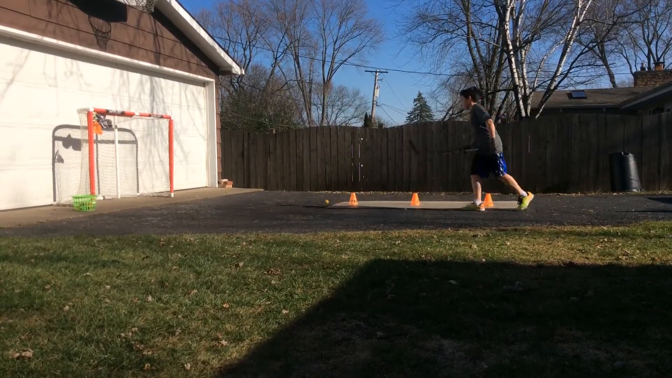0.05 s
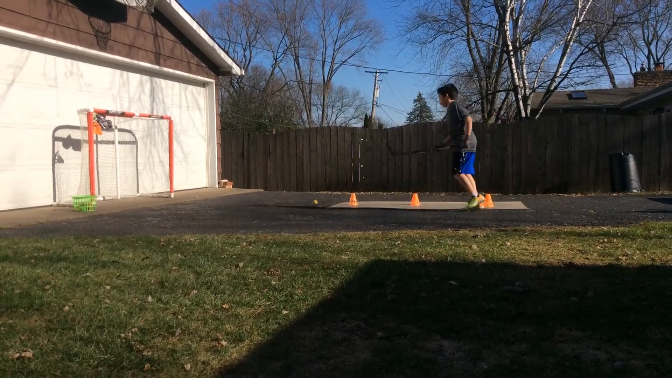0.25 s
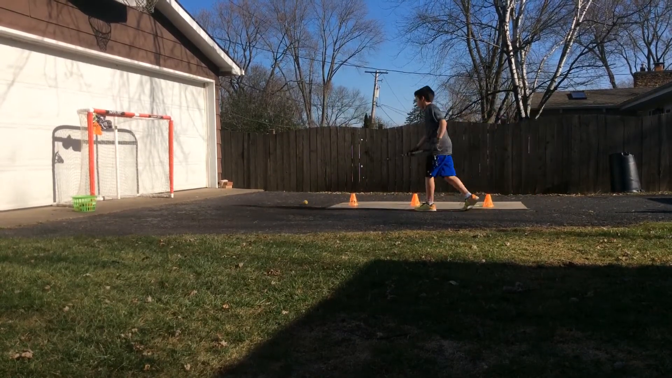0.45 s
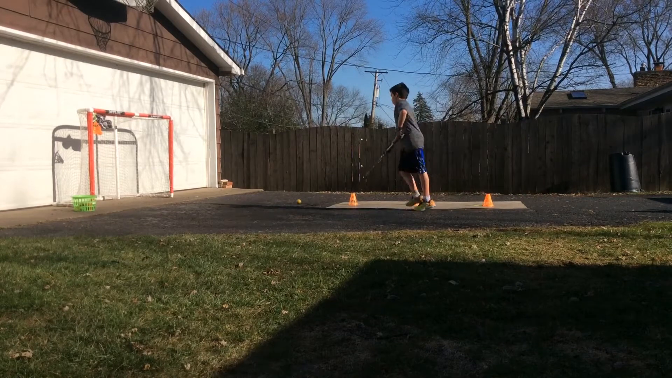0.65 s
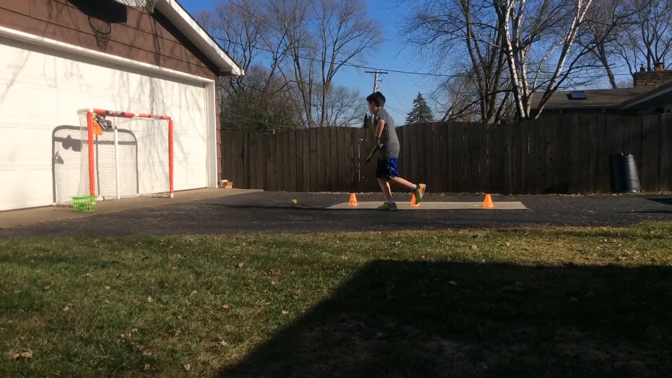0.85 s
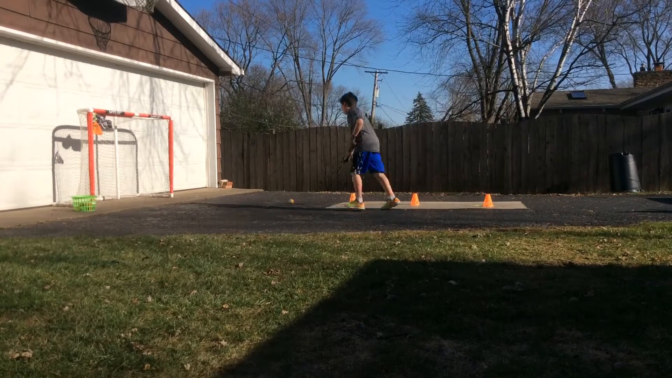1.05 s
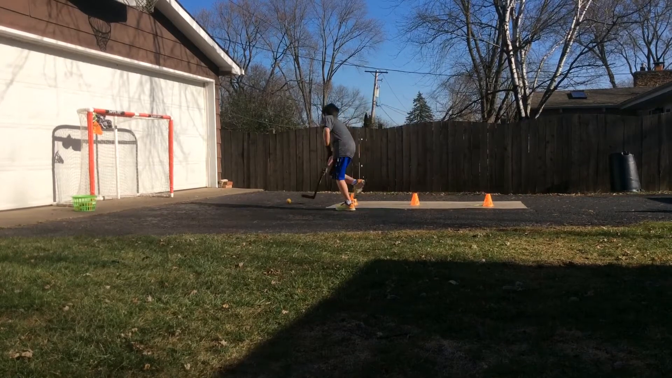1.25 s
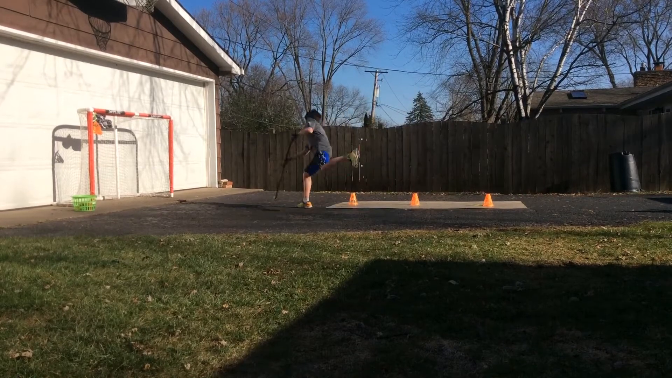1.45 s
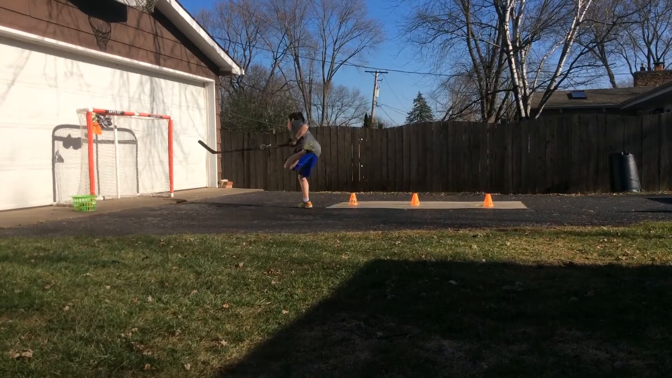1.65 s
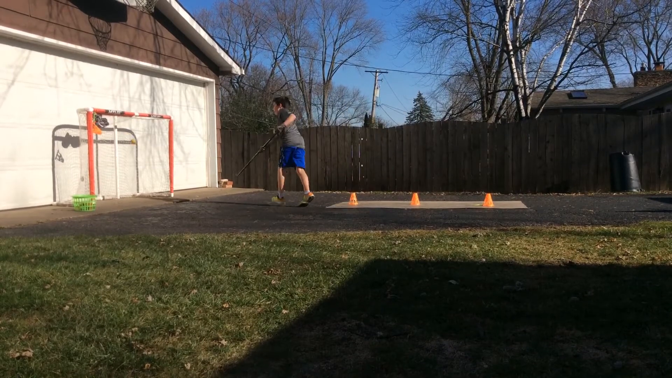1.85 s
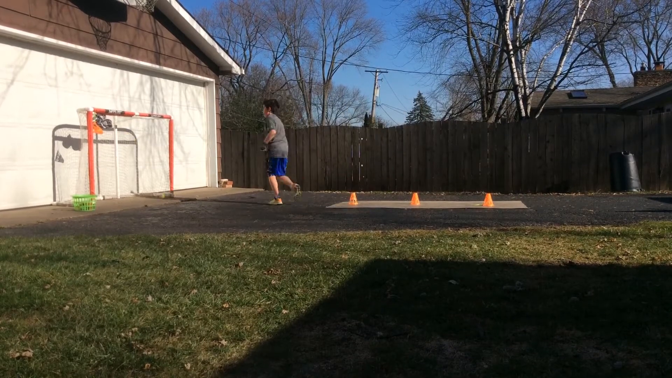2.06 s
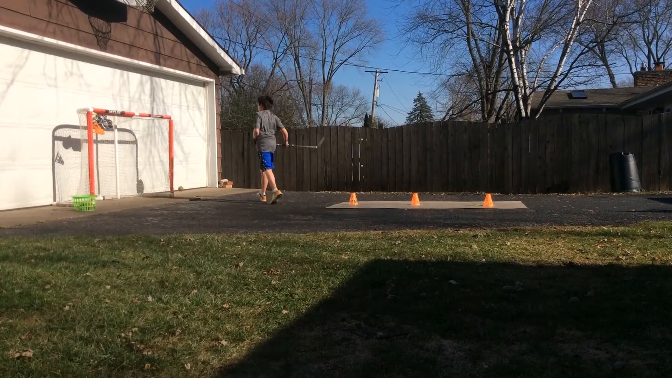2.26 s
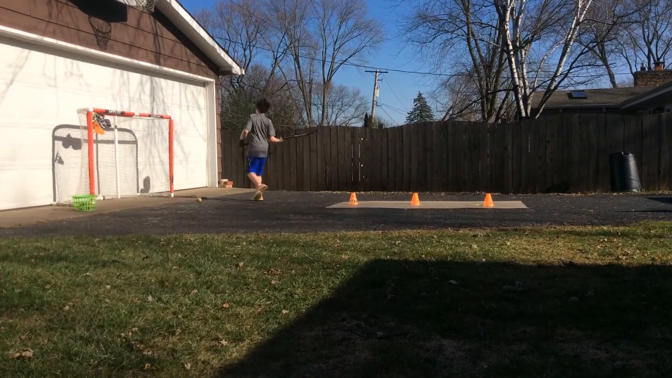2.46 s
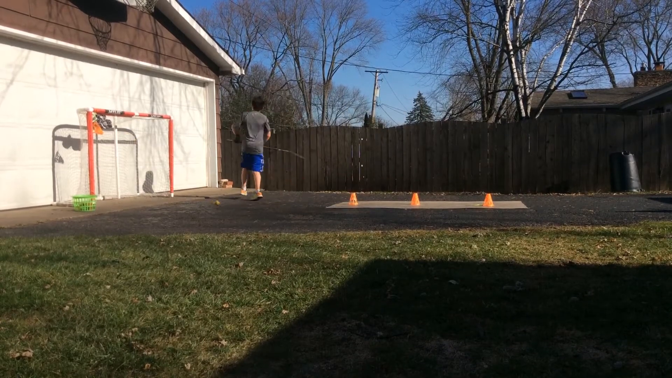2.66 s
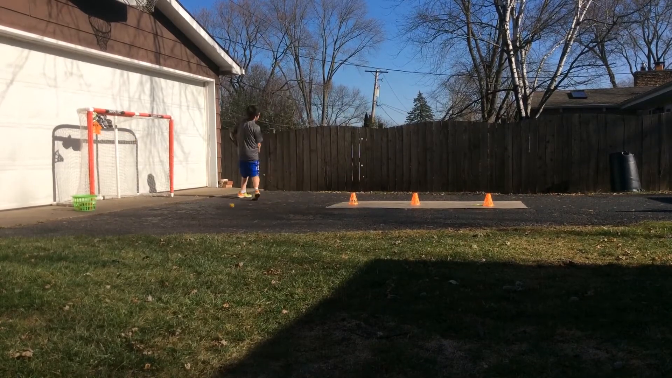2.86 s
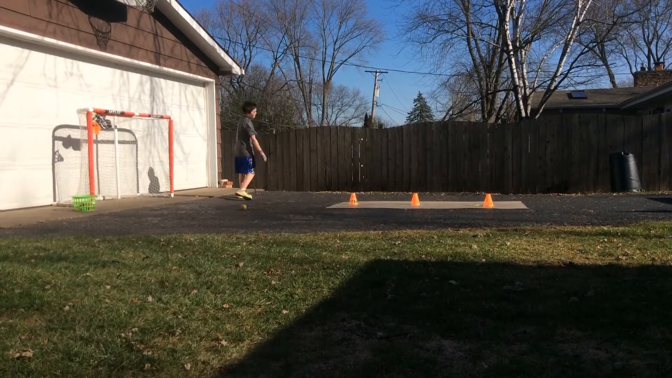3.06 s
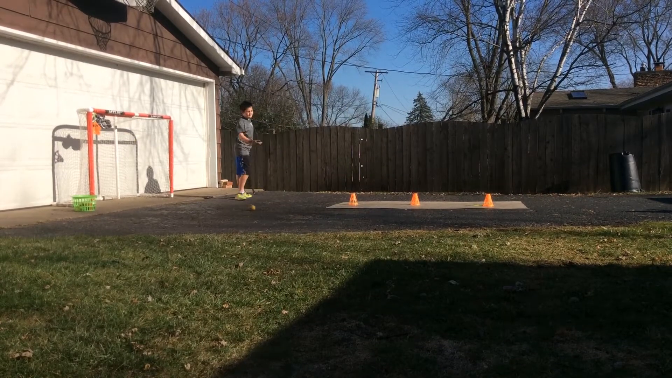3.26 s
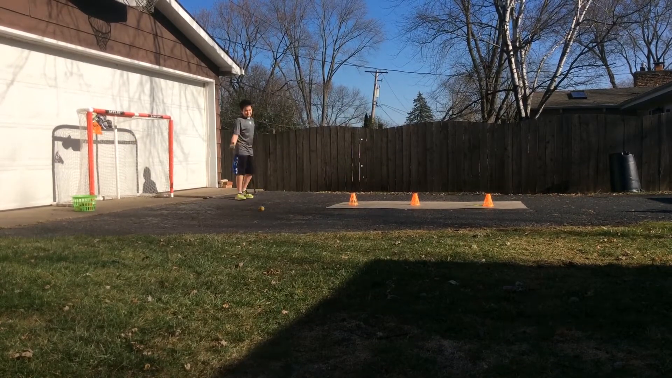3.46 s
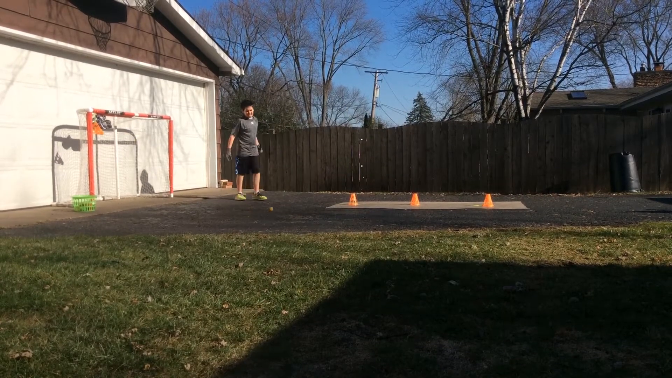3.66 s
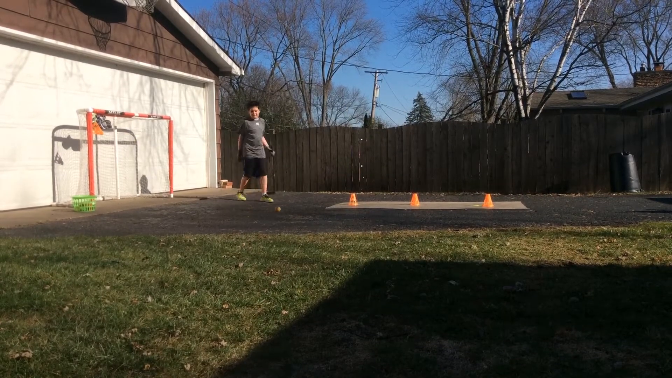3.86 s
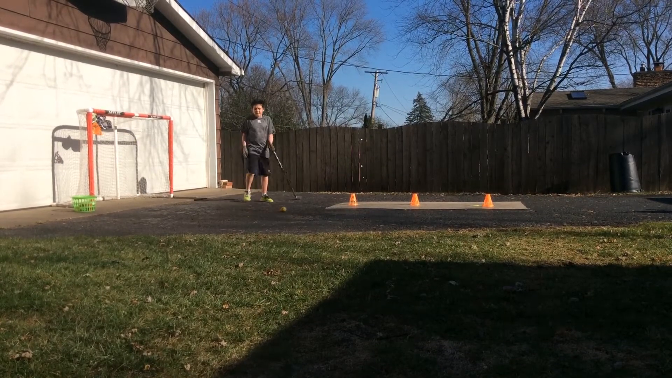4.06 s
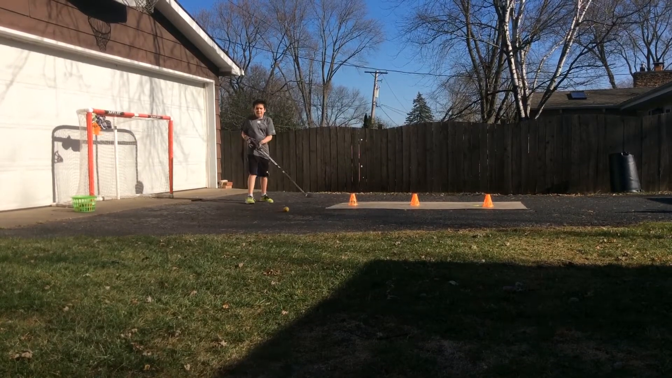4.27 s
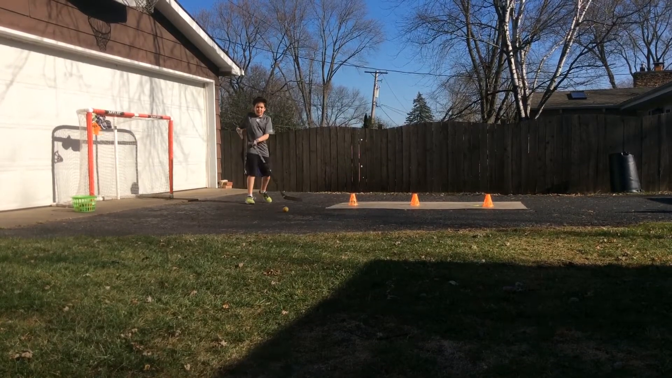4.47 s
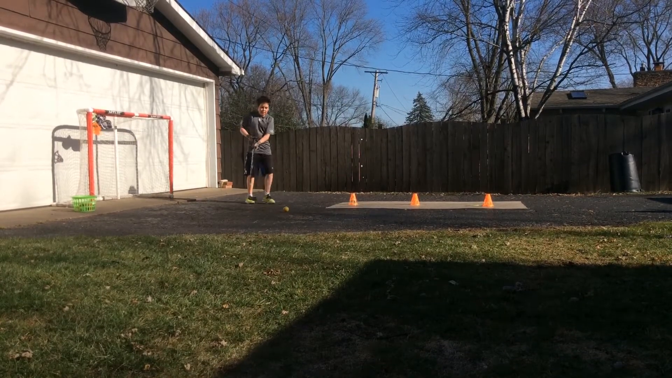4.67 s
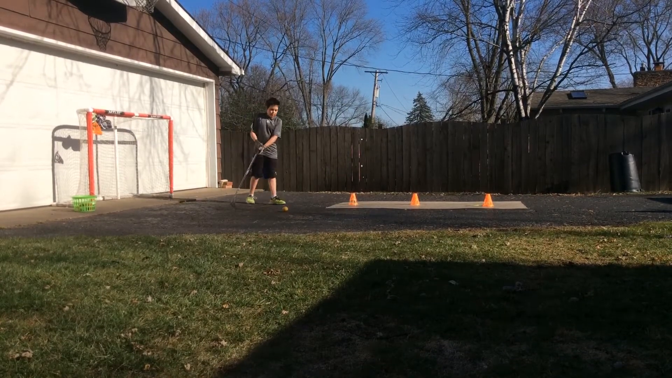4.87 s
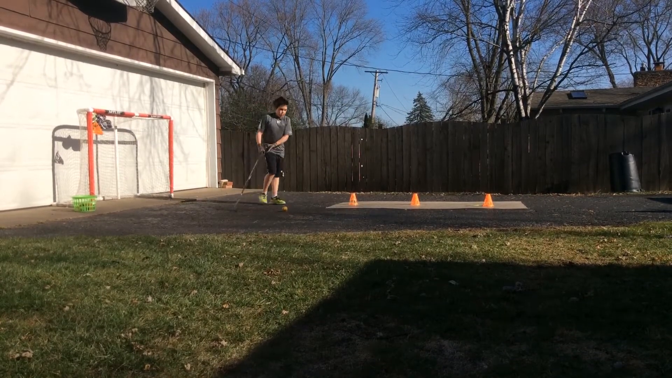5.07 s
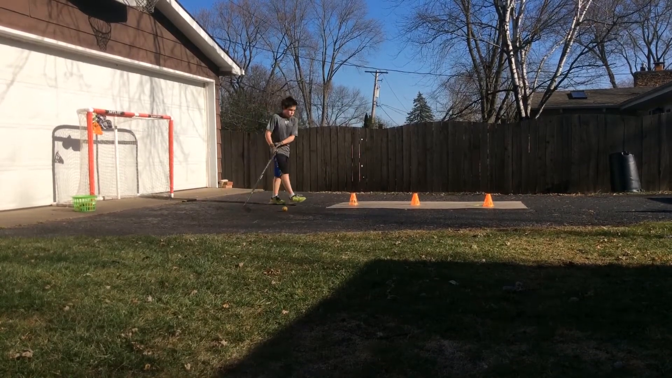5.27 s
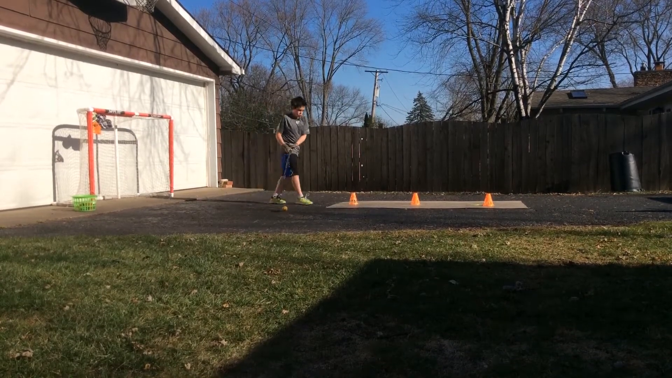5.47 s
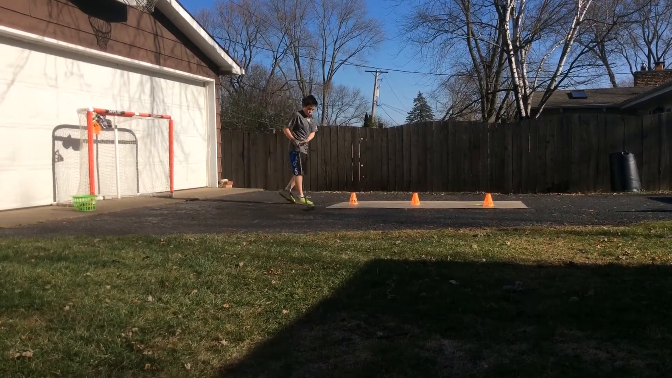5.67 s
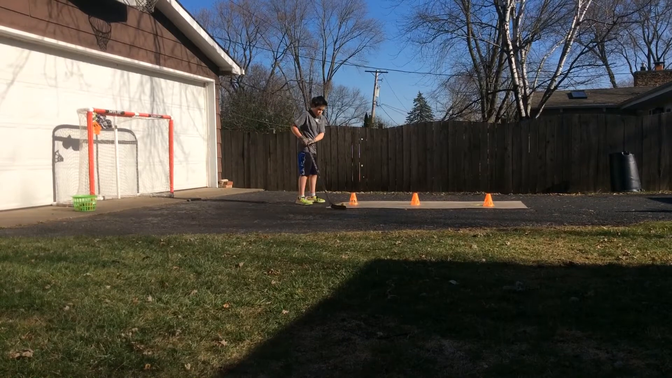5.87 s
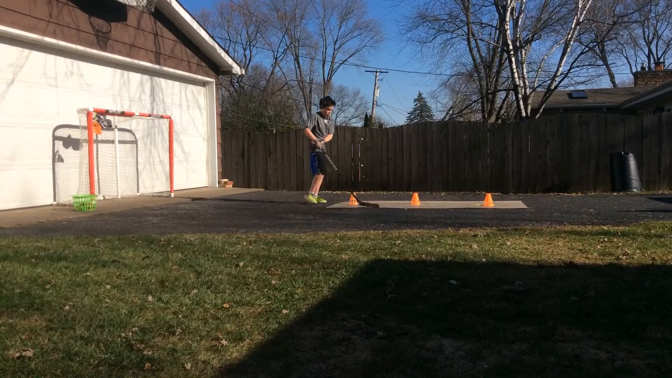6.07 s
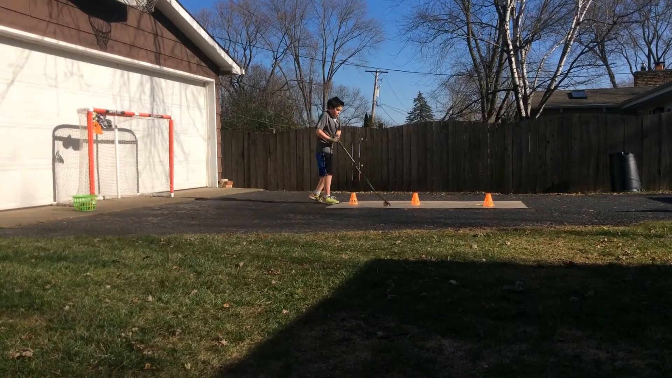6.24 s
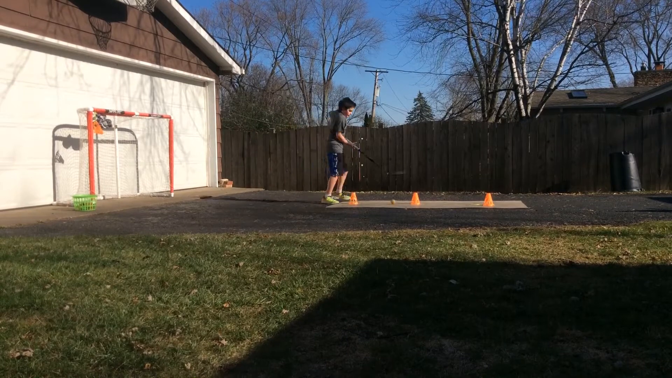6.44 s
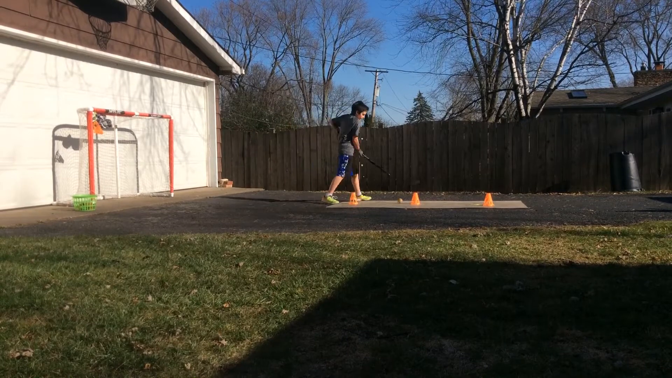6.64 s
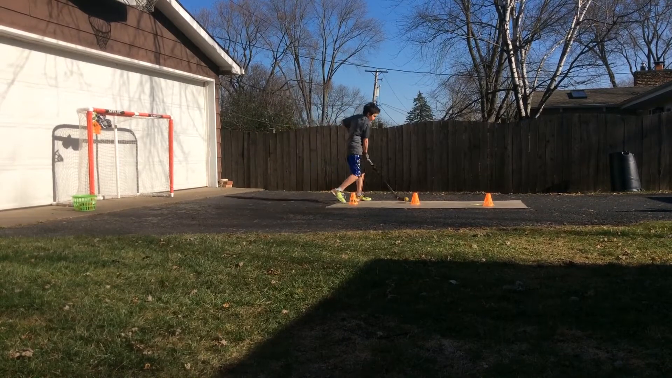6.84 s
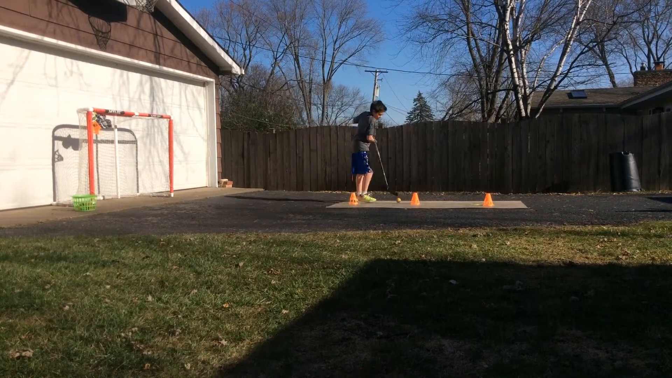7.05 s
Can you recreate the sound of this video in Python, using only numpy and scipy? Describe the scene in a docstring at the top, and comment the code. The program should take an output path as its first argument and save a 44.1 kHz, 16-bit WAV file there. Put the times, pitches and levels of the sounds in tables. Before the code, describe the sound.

Hockey stick blade clacks and taps on a driveway, one shot bangs a garage door, a stick slaps the ground, birds chirp over light wind.

```python
"""Stick handling on a driveway, heard from the lawn, with light wind on the microphone and a distant town hush.
A hockey blade taps a puck over asphalt and a plastic pad, amid dull footfalls; small birds chirp in the trees.
One shot bangs into the garage door, then the stick is slapped on the ground; short blade drags come before
and after. Blows are noise bursts that ring decaying modes, chirps are gliding whistles, air and drags are
shaped noise. Garage and fence throw the clacks back; a faint dull tail returns from the houses around."""
import sys
import numpy as np
from scipy import signal
from scipy.fft import rfft, irfft
from scipy.io import wavfile
from scipy.ndimage import uniform_filter1d

SR = 44100
rng = np.random.default_rng(int(sys.argv[2]) if len(sys.argv) > 2 else 0)


def to_wav(s):
    """Save 16-bit WAV."""
    ch = np.atleast_2d(s).T  # columns
    pcm = np.round(np.clip(ch, -1, 1) * 32767)  # PCM
    wavfile.write(sys.argv[1], SR, pcm.astype(np.int16))


N = 313492
TIME = np.arange(N) / SR
SHORT = TIME[:SR // 2]  # half a second, for blows and echo tails

# Spectrum of wind on the microphone. Each row: frequency in Hz, relative density in dB per Hz.
WIND_SPECTRUM = [(20, -38.5), (32, -22.5), (45, -11), (62, 3), (85, -2), (110, -3.5), (150, -9.5),
                 (200, -14), (280, -39), (600, -55)]
# Spectrum of the still air of the neighbourhood. Each row: frequency in Hz, relative density in dB per Hz.
TOWN_SPECTRUM = [(110, -29.5), (200, -2), (360, -6.5), (660, -9.5), (790, -5), (1000, -9), (1350, -8),
                 (2500, -20.5), (3800, -22.5), (5000, -27.5), (6800, -32), (8800, -27.5), (13500, -43),
                 (16000, -82.5)]
# Swell of the wind. Each row: time in seconds, relative level in dB.
WIND_GUSTS = [(0.0, -54.5), (0.59, -57), (0.75, -55.5), (2.12, -55), (2.67, -56), (3.28, -52.5), (4.2, -56),
              (5.13, -55), (6.1, -55), (7.11, -53)]
# Swell of the town's hush. Each row: time in seconds, level in dB before its drift.
TOWN_HUSH = [(0, -63), (1.0, -63), (2.4, -61.5), (3.3, -60.5), (4.4, -63), (5.8, -58.5), (6.6, -62.5),
             (7.11, -60.5)]
# Blade clacks, with a few of their duller late echoes as rows of their own. Each row: start in seconds,
# relative strength in dB, body in dB (low end that the ground adds), edge in dB (treble from the hardness
# of the contact), relative chatter in dB, garage echo in dB.
BLADE_CLACKS = [(0.103, -25.5, 10, 5, -10, -4), (0.906, -22.5, 15.5, -4.5, -4, -9),
                (0.926, -14, 8.5, -16, -5, -17), (1.187, -6.5, -15, -10, -23, -8.5),
                (1.479, -0.5, -5, -1.5, -8, -9), (1.51, -4.5, -12, -22, -6, -18),
                (1.524, -16, -4, 11.5, -6, -21), (1.6, 5, -2, 1.5, -8, -3), (1.624, -7, -4, 11, 0, -9),
                (2.078, -21, 13.5, -15, 5, -17), (2.239, -12.5, 7, 7.5, -13.5, -11),
                (2.468, -10.5, 10.5, -11, 0, -25), (2.492, -19, 4, -12, -9, -22), (2.653, -34, 8, 9, 0, 1),
                (2.917, -18.5, -7, -5.5, 1, -29), (3.818, -30, -6, 8, -6, -12),
                (3.868, -6, -6.5, -36, -6.5, -16), (4.2, -0.5, -11.5, -2.5, 4.5, 6),
                (5.043, 2.5, -9.5, -9, 3.5, 3), (5.205, -21, -4, 0, -4, -2), (5.305, -29, 9, 7, -10, -14),
                (5.399, -8.5, -7, -5.5, 3, -23), (5.432, -12, 1, -9, -6, -12), (5.489, -5, -5, 0.5, 2, -1),
                (5.586, -12, 11, -3, 5, -5), (5.637, -17, 8.5, 15, -12, -4), (5.739, -21.5, 2, 3.5, 2, 1.5),
                (5.9, -4, 1.5, -17.5, 3, -13), (6.011, -10, -3, -15, -2, -20),
                (6.108, -22.5, 5.5, -5.5, 3, 3.5), (6.217, -.5, -3.5, -9, 1, -11),
                (6.334, -17.5, 4.5, -1, 1, -6.5), (6.902, -8.5, 11.5, -9, -2, -6),
                (6.928, -10.5, 7, -12, 6, -20), (6.974, -9, -5, 7.5, -8.5, -22)]
# Ringing of the blade. Each row: frequency in Hz, relative level in dB, 60 dB decay in seconds.
BLADE_MODES = [(584, 9, 0.072), (797, 11, 0.094), (1810, 3, 0.032), (1810, -17, 0.071),
               (2206, 11.5, 0.0252), (2300, 4.5, 0.06), (3310, 3.5, 0.038), (3794, 12, 0.045)]
# Colour of a middling clack. Each row: frequency in Hz, gain in dB.
CLACK_COLOUR = [(70, -6.5), (220, -4.5), (480, 0), (800, -2), (1250, -4), (1650, 1.5), (2300, -2),
                (3800, -2), (5200, -3), (9500, -6.5), (15500, -24)]
# Footfalls and dull bumps. Each row: start in seconds, relative strength in dB, 60 dB decay in seconds.
FOOTFALLS = [(0.129, -6, 0.14), (0.923, -7.5, 0.049), (1.234, -6.5, 0.3), (1.578, -3, 0.078),
             (1.589, 7.5, 0.064), (1.611, -0.5, 0.14), (2.034, -3, 0.033), (2.058, -3, 0.092),
             (2.237, 0.5, 0.057), (2.468, 6, 0.13), (6.228, -11, 0.061), (6.9, -18, 0.11)]
# Bird chirps. Each row: start in seconds, length in seconds, top pitch in Hz, end pitch in Hz,
# level in dB before the paths to the microphone.
BIRD_CHIRPS = [(0.664, 0.048, 3200, 2890, -72), (0.758, .06, 3500, 3050, -65),
               (1.353, .04, 4140, 3700, -64), (1.386, 0.095, 3350, 3130, -58),
               (1.961, 0.056, 3280, 3200, -70), (2.283, 0.037, 3120, 2970, -66),
               (2.38, 0.052, 5380, 5150, -68.5), (2.675, 0.098, 3770, 2896, -54),
               (2.803, 0.072, 3970, 3400, -61.5), (3.301, 0.067, 3950, 2890, -62.5),
               (3.38, 0.08, 4100, 2590, -71.5), (3.506, 0.096, 5300, 3130, -63),
               (4.527, 0.051, 4090, 3570, -59), (4.596, .035, 3500, 3130, -61.5),
               (4.783, 0.12, 3900, 2585, -57), (5.213, 0.027, 5630, 5200, -65.5),
               (5.275, 0.085, 3760, 3500, -65.5), (6.287, 0.094, 3530, 2880, -62.5),
               (6.629, 0.048, 3194, 2930, -66.5), (6.838, 0.058, 5100, 5260, -70.5)]
# Blade drags over grit and pad. Each row: start in seconds, length in seconds, grit level in dB,
# grit treble in dB.
BLADE_DRAGS = [(1.202, 0.079, -67, 4), (1.481, 0.13, -56.5, 1), (1.63, 0.06, -60, 26),
               (3.225, 0.11, -55.5, 9), (3.805, 0.11, -64, 16), (5.402, 0.23, -56, -7.5),
               (5.737, 0.064, -59, -6), (5.923, 0.25, -61, -6), (6.217, 0.24, -61.5, -2),
               (6.894, 0.2, -62.5, -6.5)]
# The shot on the garage door. One row: relative strength in dB, body in dB, edge in dB, relative chatter
# in dB, garage echo in dB.
DOOR_SHOT = (0, 4, -0.5, -4, -6.5)
# Ringing of the door panel. Each row: frequency in Hz, relative level in dB, 60 dB decay in seconds.
DOOR_MODES = [(151, -7, .18), (200, -1.5, 0.082), (287, -1, 0.08), (360, 0, 0.071), (437, -1, 0.13),
              (632, -3, 0.1), (1240, -8, 0.06), (1307, -3, 0.048), (1510, 7.5, 0.019), (1550, 3, .07),
              (1580, 0, 0.067), (4800, -1, 0.015)]
# Colour of the door blow. Each row: frequency in Hz, gain in dB.
DOOR_COLOUR = [(70, 0), (220, -2.5), (480, -1.5), (800, -5.5), (1250, -1.5), (1650, -3.5), (2300, -5),
               (3800, -1.5), (5200, -11), (9500, -0.5), (15500, -17)]
# The stick slapped flat on the ground: heel, toe, one bounce. Each row: start in seconds, relative strength
# in dB, body in dB, edge in dB, relative chatter in dB, garage echo in dB.
STICK_SLAPS = [(2.9793, 7.6, -2.5, 6, -10, 1), (2.985, 13.3, -4.5, -21, -2, -3.5),
               (3.169, 1.5, 2, -4.5, 8, 0)]
# Ringing of the whole shaft. Each row: frequency in Hz, relative level in dB, 60 dB decay in seconds.
SHAFT_MODES = [(376, 0, 0.096), (474, -11, 0.054), (800, -1.5, 0.11), (1216, 6, 0.12), (1275, 3.5, 0.075),
               (1376, -5, 0.085), (1640, -8, 0.07), (1500, -15, 0.097), (1815, 1.5, 0.12), (2274, 1, 0.05),
               (3160, -4, 0.045), (3820, -5, 0.028)]
# Colour of a middling slap. Each row: frequency in Hz, gain in dB.
SLAP_COLOUR = [(70, -19), (220, -7.5), (480, -2), (800, 0), (1250, -1), (1650, 1), (2300, -1.5),
               (3800, 1.5), (5200, -5.5), (9500, -16.5), (15500, -31.5)]

# body acts in full below its first frequency and not above its second; edge the other way round
BODY_HZ, EDGE_HZ = (740, 1650), (2300, 3800)
FENCE_S = 0.032  # lag of the fence echo behind the direct sound
# every chirp flicks up to its top pitch, then slides to its end pitch and levels off
CHIRP_RISE_S, CHIRP_RISE_OCT, CHIRP_EASE = 0.018, 0.2, 1.6
# the blade skips more on smooth ground than on sharp grit: clatter against grit level,
# and its loss per dB of grit treble
CLATTER_DB, CLATTER_DB_PER_TREBLE = -1.5, 0.2
SHOT_S = 1.7897  # moment at which the shot lands on the garage door
# the door panel then knocks in its track: spacing, first knock and loss per knock, added body and edge
RATTLE_S = 0.0143
RATTLE_DB, RATTLE_LOSS_DB, RATTLE_BODY_DB, RATTLE_EDGE_DB = -15.5, 4, 6, -6
TOP_HZ = 15900  # upper limit of the recorder


def amp(db):
    """Decibels to gain."""
    return 10 ** (np.asarray(db) / 20)


def unit(x):
    """Scale to an energy of one."""
    return x / np.sqrt(np.sum(x ** 2))


def level(x, db):
    """Scale to an rms level."""
    return unit(x) * np.sqrt(len(x)) * amp(db)


def fade(t60):
    """Exponential decay, 60 dB down after t60 seconds."""
    return np.exp(-np.log(1000) * SHORT / max(t60, 1 / SR))


def add(out, s, x):
    """Mix x into out from time s."""
    i = int(s * SR)
    out[i:i + len(x)] += x[:len(out) - i]


def late(x, s):
    """Delay by s seconds."""
    return np.concatenate([np.zeros(int(s * SR)), x])[:len(x)]


def through(x, response):
    """Pass a sound through an impulse response."""
    return signal.fftconvolve(x, response)[:len(x)]


def colour(x, points):
    """Causal minimum-phase filter whose gain follows (Hz, dB) points."""
    size = 4096
    hz, db = np.transpose(points)
    grid = np.maximum(np.arange(size // 2 + 1) * SR / size, 1)
    gain_db = np.interp(np.log(grid), np.log(hz), db)
    # folding the cepstrum forward in time makes the filter causal
    cepstrum = irfft(np.log(amp(gain_db)))
    cepstrum[1:size // 2] *= 2
    cepstrum[size // 2 + 1:] = 0
    return through(x, irfft(np.exp(rfft(cepstrum))))


def walk(rate):
    """Slow random drift with an rms of one, from random values drawn rate times a second and smoothed."""
    k = int(SR / rate)
    held = np.repeat(rng.standard_normal(N // k + 1), k)
    smooth = uniform_filter1d(uniform_filter1d(held, k), k)
    return level(smooth[:N], 0)


def air(wind_db=2.0, gust_db=1.5, drift_db=1.82):
    """Wind buffets the microphone over the even hush of the distant town: two coloured, drifting noises."""
    wind = level(colour(rng.standard_normal(N), WIND_SPECTRUM), wind_db)
    town = level(colour(rng.standard_normal(N), TOWN_SPECTRUM), 0)
    gusts_db = np.interp(TIME, *np.transpose(WIND_GUSTS)) + gust_db * walk(9)
    hush_db = np.interp(TIME, *np.transpose(TOWN_HUSH)) + drift_db * walk(12)
    return wind * amp(gusts_db) + town * amp(hush_db)


def burst(envelope):
    """A spray of tiny impacts under an envelope, with its energy spread evenly over frequency."""
    x = rng.standard_normal(len(envelope)) * envelope
    gate = np.minimum(1, 4 * envelope / envelope.max())
    for _ in range(6):
        # a hard contact excites all frequencies alike, yet stays within its short span
        flat = irfft(np.exp(1j * np.angle(rfft(x))), len(x))
        x = gate * flat
    return unit(x)


def contact(db, body_db, edge_db, chatter_db, tone, contact_s, chatter_t60):
    """A hard crack and a chatter as the parts settle, coloured by the ground and the contact's hardness."""
    # the contact force peaks after two contact times, then lets go
    crack = burst((SHORT / contact_s) ** 2 * np.exp(-SHORT / contact_s))
    chatter = amp(chatter_db) * late(burst(fade(chatter_t60)), 0.002)
    hz, tone_db = np.transpose(tone)
    body = np.interp(hz, BODY_HZ, [body_db, 0])
    edge = np.interp(hz, EDGE_HZ, [0, edge_db])
    return amp(db) * colour(unit(crack + chatter), np.transpose([hz, tone_db + body + edge]))


def ringing(modes, db, scatter_db=4.0):
    """Response of a struck body: the blow plus decaying modes, whose shares depend on where it lands."""
    out = signal.unit_impulse(len(SHORT))
    for hz, mode_db, t60 in modes:
        share = amp(db + mode_db + scatter_db * rng.uniform(-1, 1))
        per_sample = 2 * np.log(1000) / (t60 * SR)  # evens out the peaks of long and short modes
        out = out + share * per_sample * fade(t60) * np.cos(2 * np.pi * hz * SHORT)
    return out


def blows(table, modes, tone, ring_db, contact_s, chatter_t60, wall_s, wall_edge_db, fence_db, fence_edge_db,
          wall_chatter_db=-3, fence_chatter_db=5):
    """Each row rings the body and arrives direct, off the flat garage wall, and scattered by the fence."""
    out = np.zeros(N)
    for s, db, body_db, edge_db, chatter_db, echo_db in table:
        # each path: lag in seconds, then changes of strength, edge and chatter in dB
        paths = [(0, 0, 0, 0),
                 (wall_s, echo_db, wall_edge_db, wall_chatter_db),
                 (FENCE_S, fence_db, fence_edge_db, fence_chatter_db)]
        for lag, path_db, dull_db, smear_db in paths:
            hit = contact(db + path_db, body_db, edge_db + dull_db, chatter_db + smear_db,
                          tone, contact_s, chatter_t60)
            add(out, s + lag, through(hit, ringing(modes, ring_db)))
    return out


def clacks():
    """Light taps, and their late echoes, carry the ring of the blade only."""
    return amp(-3.5) * blows(
        BLADE_CLACKS, BLADE_MODES, CLACK_COLOUR, ring_db=-9.5, contact_s=0.00045, chatter_t60=0.069,
        wall_s=0.0125, wall_edge_db=-2.5, fence_db=-13, fence_edge_db=0)


def feet():
    """Footfalls and bumps: soft, heavy contacts with little treble, as decaying bursts."""
    out = np.zeros(N)
    for s, db, t60 in FOOTFALLS:
        add(out, s, amp(db) * burst(fade(t60)))
    return colour(out, [(50, -7.0), (160, 2), (400, -2), (800, -14.5),
                        (1600, -22), (4000, -29.5), (12000, -45)])


def birds(trees_t60=0.34, flutter_db=3.5, direct_db=-6, house_db=-9, trees_db=-4):
    """Burry, arched and gliding whistles that arrive mostly as echoes from houses and trees."""
    out = np.zeros(N)
    burr = 1 + 0.024 * walk(700) + 0.014 * walk(150)  # quick wobble of the pitch
    flutter = amp(flutter_db * walk(120))
    for s, length, top_hz, end_hz, db in BIRD_CHIRPS:
        t = TIME[:int(length * SR)]
        now = slice(int(s * SR), int(s * SR) + len(t))
        rise = 2 ** (-CHIRP_RISE_OCT * np.interp(t, [0, CHIRP_RISE_S], [1, 0]) ** 2)
        still_to_go = np.interp(t, [CHIRP_RISE_S, length], [1, 0]) ** CHIRP_EASE
        slide = end_hz + (top_hz - end_hz) * still_to_go
        whistle = np.sin(2 * np.pi * np.cumsum(rise * slide * burr[now]) / SR)
        arch = np.sqrt(t * (length - t))
        add(out, s, level(whistle * arch * flutter[now], db))
    trees = late(unit(rng.standard_normal(len(SHORT)) * fade(trees_t60)), 0.0051)
    return amp(direct_db) * out + amp(house_db) * late(out, 0.014) + amp(trees_db) * through(out, trees)


def clatter(length, per_s=260, low_hz=600, high_hz=4600, cycles=24, spread_db=5):
    """Uneven little knocks of a skipping blade; each rings for a few cycles at its own pitch."""
    out = np.zeros(length)
    for when, pitch, size in rng.random((int(per_s * length / SR) + 1, 3)):
        hz = low_hz * (high_hz / low_hz) ** np.sqrt(pitch)
        strength = amp(spread_db * min(-np.log(size), 3))
        knock = strength * fade(cycles / hz) * np.sin(2 * np.pi * hz * SHORT)
        add(out, when * length / SR, knock)
    return out


def scrapes(grit_db=3, judder_db=3, judder_s=0.00597):
    """Grit snaps under the sliding blade, which judders as it catches; pressure comes fast and eases off."""
    out = np.zeros(N)
    for s, length, db, treble_db in BLADE_DRAGS:
        u = np.linspace(0, 1, int(length * SR))
        pressure = np.minimum(u * 20, 1) * np.sqrt(1 - u)
        # about a quarter of the samples carry a grain, of uneven size
        grain_size = amp(grit_db * np.minimum(rng.exponential(size=N), 3))
        grains = rng.standard_normal(N) * (rng.random(N) < 0.25) * grain_size
        grains = (grains * amp(judder_db * walk(1 / judder_s)))[:len(u)]
        grit = colour(grains, [(100, 7.5), (500, 6.0), (2000, -4.5), (4500, treble_db - 3.5),
                               (9000, treble_db - 5.5), (15000, treble_db - 18.5)])
        clatter_db = db + CLATTER_DB - CLATTER_DB_PER_TREBLE * treble_db
        skips = level(clatter(len(u)) * pressure, clatter_db)
        add(out, s, level(grit * pressure, db) + skips)
    return out


def door(count=3):
    """The shot lands on the garage door; its panel booms and rattles, weaker on every knock."""
    db, body_db, edge_db, chatter_db, echo_db = DOOR_SHOT
    hits = [(SHOT_S, db, body_db, edge_db, chatter_db, echo_db)]
    for k in range(count):
        knock_s = SHOT_S + (k + 2) * RATTLE_S
        knock_db = db + RATTLE_DB - k * RATTLE_LOSS_DB
        hits.append((knock_s, knock_db, body_db + RATTLE_BODY_DB, edge_db + RATTLE_EDGE_DB,
                     chatter_db, echo_db))
    return blows(hits, DOOR_MODES, DOOR_COLOUR, ring_db=8.5, contact_s=0.00058, chatter_t60=0.11,
                 wall_s=0.0142, wall_edge_db=-1.0, fence_db=-27, fence_edge_db=-5)


def slaps():
    """A flat slap on the ground rings the whole shaft."""
    return amp(-4.0) * blows(
        STICK_SLAPS, SHAFT_MODES, SLAP_COLOUR, ring_db=4, contact_s=0.00035, chatter_t60=0.08,
        wall_s=0.018, wall_edge_db=-15.5, fence_db=-23, fence_edge_db=-4.5)


def yard(x, near_t60=0.15, near_db=-10, far_t60=0.37, far_db=-17):
    """Quick scatter from garage and fence, then a faint dull tail from the houses around."""
    near = late(unit(rng.standard_normal(len(SHORT)) * fade(near_t60)), 0.011)
    far = late(unit(rng.standard_normal(len(SHORT)) * fade(far_t60)), 0.055)
    near = colour(near, [(150, 1.0), (1500, 2.0), (5000, -3.0), (14000, -7.0)])
    far = colour(far, [(150, 4), (900, -5.5), (2000, 0.0), (4000, -3.5), (8000, -9.5), (14000, -7)])
    return x + through(x, amp(near_db) * near + amp(far_db) * far)


def scene():
    """The play on the driveway, with birds and wind around it, on one channel."""
    play = clacks() + feet() + scrapes() + door() + slaps()
    return (air() + birds() + yard(play))[None]


def record(dry):
    """The recorder cuts the top with a steep low-pass."""
    low_pass = signal.ellip(8, 0.2, 70, TOP_HZ, fs=SR, output="sos")
    return signal.sosfilt(low_pass, dry)


dry = scene()
out = record(dry)
to_wav(out)
```